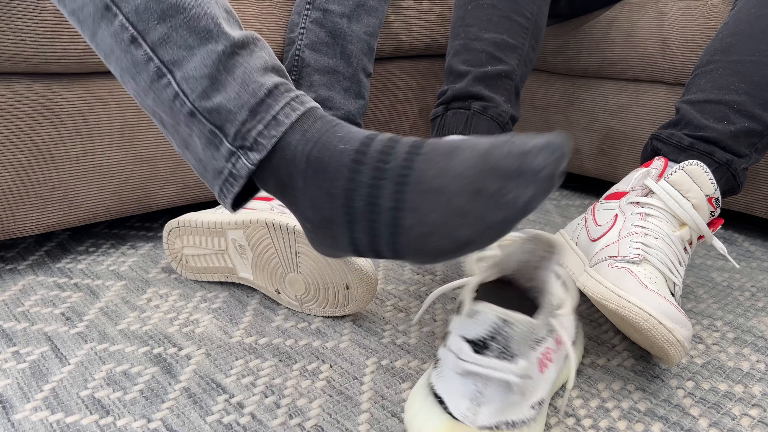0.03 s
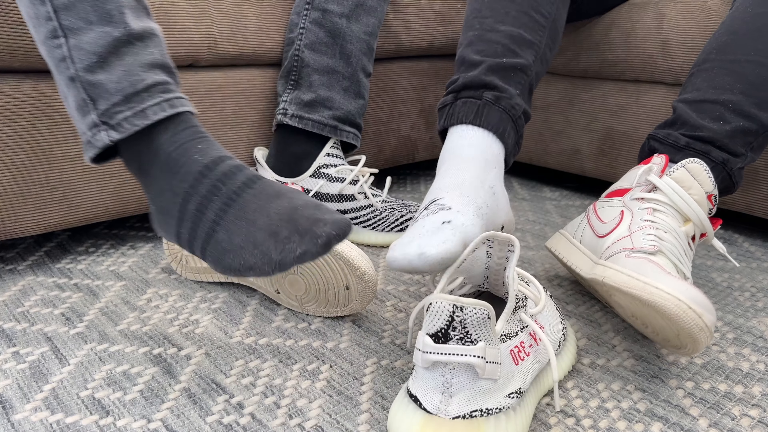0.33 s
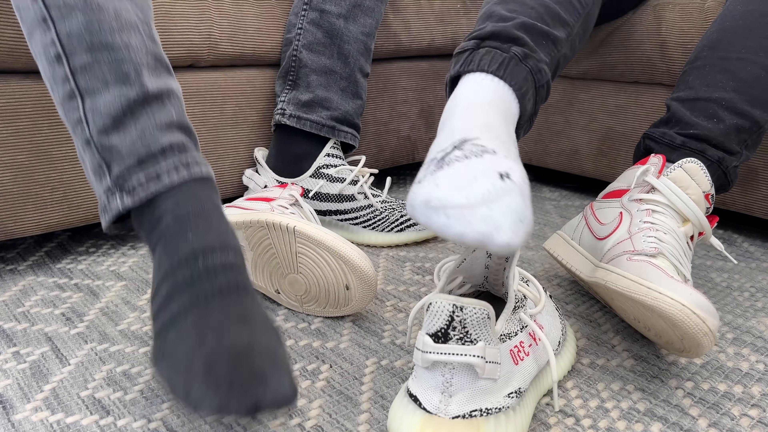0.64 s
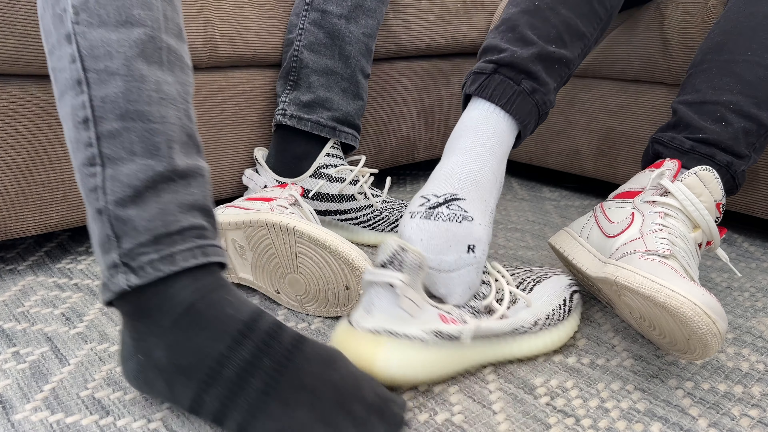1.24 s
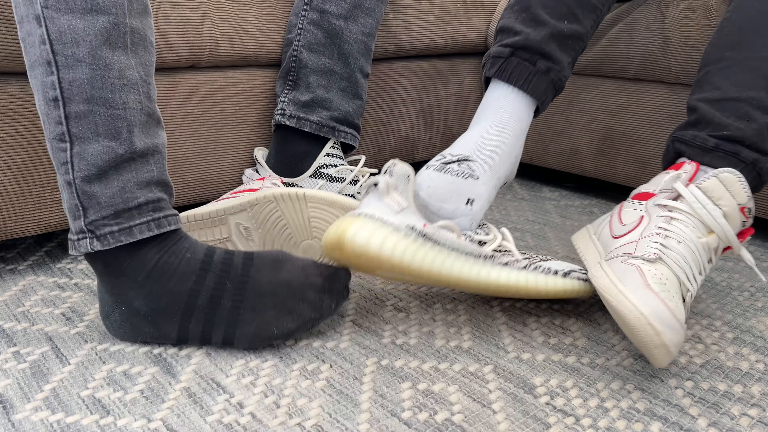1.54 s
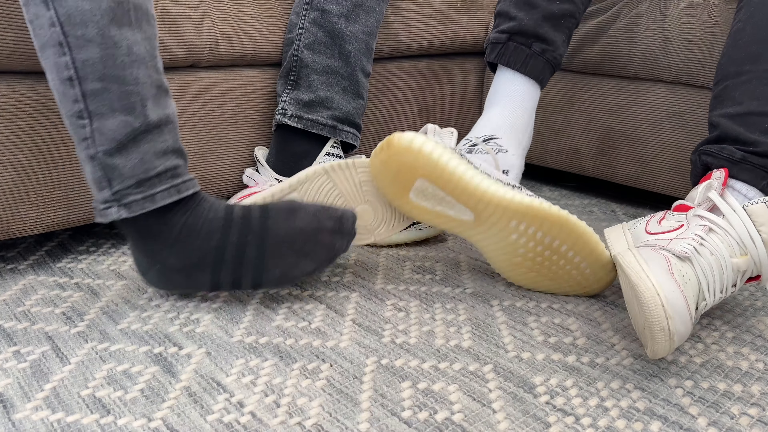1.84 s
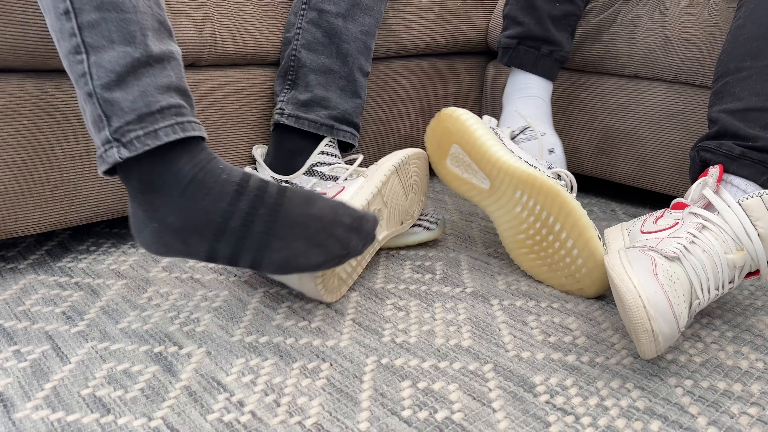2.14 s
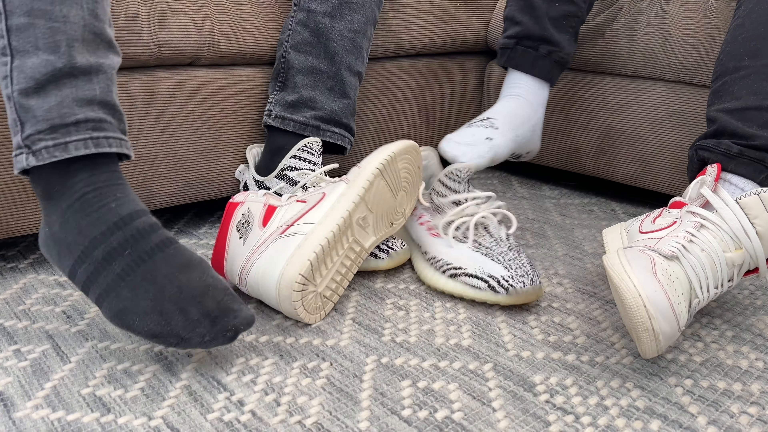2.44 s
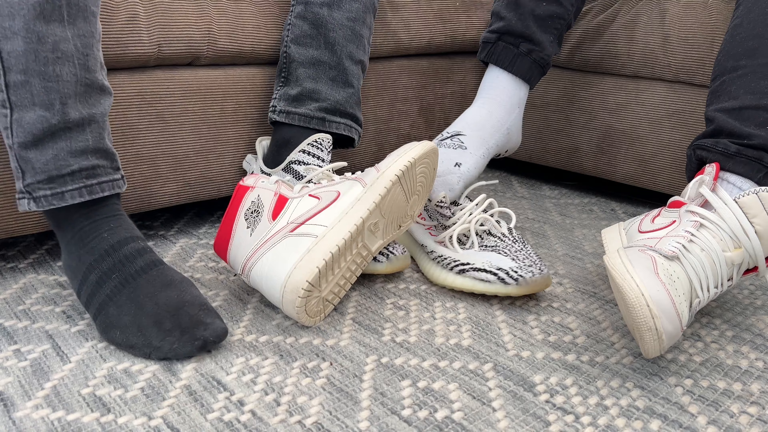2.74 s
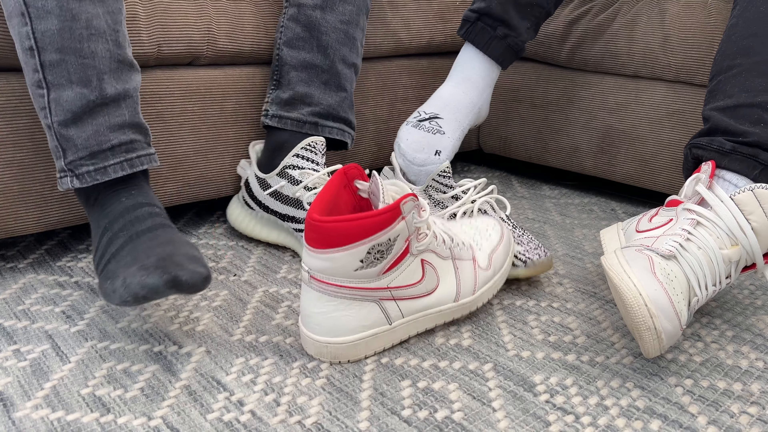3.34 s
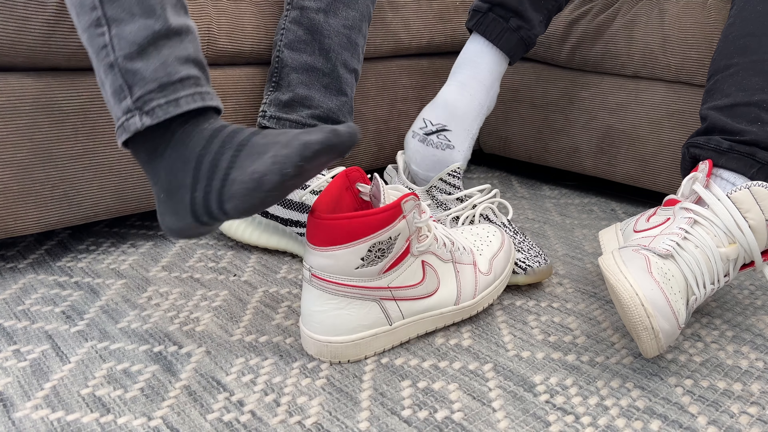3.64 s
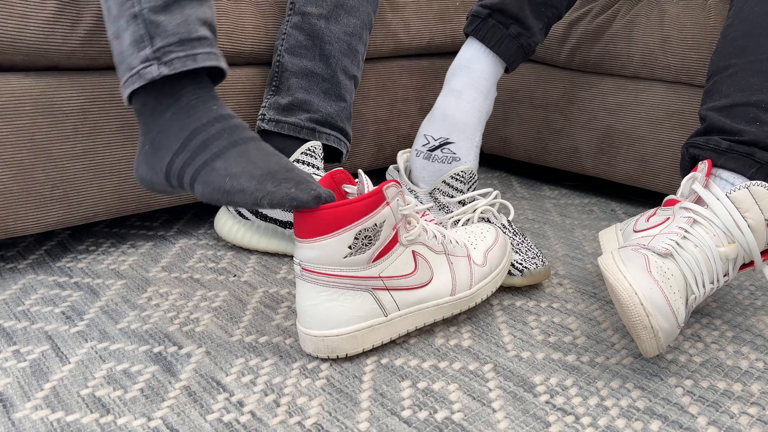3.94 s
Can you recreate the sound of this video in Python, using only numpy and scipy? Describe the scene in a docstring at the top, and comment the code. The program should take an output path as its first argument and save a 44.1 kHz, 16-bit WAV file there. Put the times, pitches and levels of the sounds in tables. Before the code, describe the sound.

Sneakers bump and scuff on a rug, close by, as socked feet push them about. A padded knock comes at the start, then soft brushing and rasping from about 0.9 to 1.5 seconds with another bump. Several light knocks and ticks cluster between 1.8 and 2.4 seconds. At 3.2 seconds a shoe tips onto its sole with a low thump. A deep hum swells and fades over room rumble throughout.

```python
"""A deep hum swells and fades over the rumble of a small furnished room. Close by, feet in socks push
sneakers about on a rug: laces and leather tick, the shoes bump so that their rubber soles ring briefly,
and cloth and soles brush and rasp in soft strokes as fibres catch. Near the end one shoe tips over
onto its sole with a low thump."""
import sys
import numpy as np
from scipy import signal
from scipy.fft import rfft, irfft, next_fast_len
from scipy.io import wavfile
from scipy.ndimage import uniform_filter1d, map_coordinates

SR = 44100
rng = np.random.default_rng(int(sys.argv[2]) if len(sys.argv) > 2 else 0)


def waveform_to_disk(signal):
    """Save audio, clipped to [-1, 1], as 16-bit WAV at the path in sys.argv[1]."""
    frames = np.transpose(np.atleast_2d(signal))
    scaled = np.clip(frames, -1, 1) * 32767
    samples = np.round(scaled).astype(np.int16)
    wavfile.write(sys.argv[1], SR, samples)


N = 176400  # 4 seconds
LAG_CYCLES = 1.697  # the bass of a bump comes after its treble

# tone of rubbing cloth: (frequency [Hz], relative level [dB])
CLOTH_TONE = [(300, -8), (900, 2), (1500, 3), (2300, 2), (3600, 1), (5200, -1), (6800, -1.5), (8300, -0.5),
              (9200, -4), (10000, -23.5), (12500, -10), (15500, -25.5)]


def amp(db):
    """Turn decibels into a gain."""
    return 10 ** (np.asarray(db) / 20)


def unit(x):
    """Scale a sound to an average strength (rms) of 1."""
    return x / np.sqrt(np.mean(x ** 2) + 1e-20)


def along(points, hz):
    """Read between (frequency, value) points on a log scale."""
    freqs, values = np.transpose(points)
    return np.interp(np.log(hz + 1), np.log(freqs + 1), values)


def curve(rows):
    """Join (time, value) points with lines, one value per sample."""
    return np.interp(np.arange(N) / SR, *np.transpose(rows))


def wobble(rate):
    """A smooth curve through `rate` random points a second."""
    points = rng.standard_normal(int(N * rate / SR) + 4)
    return map_coordinates(points, [np.arange(N) * rate / SR])


def bell(hz, centre_hz, octaves):
    """A bell-shaped gain that favours pitches near the centre."""
    return np.exp(-.5 * (np.log2(np.maximum(hz, 1) / centre_hz) / octaves) ** 2)


def filtered(x, response):
    """Turn each frequency up or down by response(hz)."""
    size = next_fast_len(N + SR // 2)
    return irfft(rfft(x, size) * response(np.fft.rfftfreq(size, 1 / SR)), size)[..., :N]


def stereo(pair, tone, alike):
    """Give two unrelated noises a tone and blend them into partly alike left and right."""
    turn = lambda hz: np.arccos(np.clip(along(alike, hz), -1, 1)) / 2
    mid, side = filtered(pair, lambda hz: amp(along(tone, hz)) * [np.cos(turn(hz)), np.sin(turn(hz))])
    return unit(np.array([mid + side, mid - side]))


def pan(db):
    """Gains that make the left side db louder than the right."""
    return amp([[db / 2], [-db / 2]])


def add(track, start, sound):
    """Mix a sound in at `start` seconds."""
    part = track[max(round(start * SR), 0):][:len(sound)]
    part += sound[:len(part)]


def contact(start, force, tone, lag=LAG_CYCLES):
    """A push heard through an object whose low notes come `lag` cycles late; its peak is 1."""
    size, lead = SR // 4, SR // 40
    hz = np.maximum(np.fft.rfftfreq(size, 1 / SR), 1)
    bass_delay = np.exp(-2j * np.pi * lag * np.log(hz / hz[-1]))
    hit = np.roll(irfft(rfft(force, size) * tone(hz) * bass_delay, size), lead)
    out = np.zeros(N)
    add(out, start - lead / SR, hit / np.abs(hit).max())
    return out


def hum():
    """A deep, nearly pure hum that drifts in pitch, swells and fades."""
    # the drift: (time [s], pitch [Hz])
    pitch = [(0, 52), (.5, 53.5), (1.0, 55.5), (1.6, 54), (2.4, 55.5), (2.8, 57), (3.3, 58.5), (3.6, 57.5),
             (4, 54.5)]
    # the swells: (time [s], level [dB])
    level = [(0, -46), (.1, -42.5), (.4, -43), (.68, -51), (1.0, -42), (1.3, -42.5), (1.48, -36.5),
             (1.58, -38.5), (1.7, -57), (2.05, -42), (2.25, -54.5), (2.45, -42.5), (2.64, -33.5),
             (2.98, -35.5), (3.18, -47), (3.47, -33.5), (3.6, -35.5), (3.72, -48), (4, -53.5)]
    wave = np.sqrt(2) * np.sin(2 * np.pi * np.cumsum(curve(pitch)) / SR)
    return amp(curve(level) + 0.34 * wobble(7.3)) * wave


def room_noise():
    """A steady rumble and a soft, slightly hollow rush of air that grows a little."""
    # tone of the rumble: (frequency [Hz], relative level [dB])
    rumble_tone = [(15, -33), (28, -20), (38, 1), (55, 2.5), (72, 3.5), (95, -2.5), (120, -4.5),
                   (140, -1.5), (178, -5), (215, -12), (260, -11.5), (340, -21.5), (500, -25.5), (900, -70)]
    # tone of the rush: (frequency [Hz], relative level [dB])
    air_tone = [(150, -15), (400, -2.5), (560, -1), (800, -2), (1200, -5), (1600, -11.5), (2100, -18.5),
                (3200, -27.5), (5500, -30.5), (8500, -38), (11000, -46), (15500, -54.5)]
    # peaks that make it hollow: (frequency [Hz], half width [Hz], boost [dB])
    air_peaks = [(542, 17, 4.5), (651, 19, 6), (801, 63, 5)]
    # loudness of the rush: (time [s], level [dB])
    air_level = [(0, -56), (.7, -57), (1.5, -54), (2.0, -53.5), (2.6, -53.5), (3.4, -53.5), (4, -53)]
    # how alike left and right are: (frequency [Hz], likeness [0 to 1])
    alike = [(60, 0.96), (130, 0.98), (260, 0.77), (500, 0.37), (1000, 0.38), (2500, 0.13), (8000, 0.067)]
    rumble = stereo(rng.standard_normal((2, N)), rumble_tone, alike)
    air = stereo(rng.standard_normal((2, N)), air_tone, alike)
    hollow = lambda f: amp(sum(db / (1 + ((f - hz) / width) ** 2) for hz, width, db in air_peaks))
    air = unit(filtered(air, hollow))
    return amp(-44.5) * rumble + amp(curve(air_level) + 0.37 * wobble(5.03)) * air


def ticks():
    """Laces and leather snap: each tick is a tiny burst of noise."""
    # (time [s], peak level [dB], centre [Hz], width [octaves], time to fade by 60 dB [s])
    snaps = [(0.032, -60, 3000, 0.32, 0.02), (.149, -63, 2800, 0.76, .012),
             (1.573, -50, 3000, 0.65, 0.0075), (1.585, -56, 3500, 0.96, .005),
             (1.634, -63, 4000, 0.89, .005), (1.956, -56.5, 2900, 0.35, .01),
             (1.956, -64.5, 8000, .6, .008), (2.24, -42, 3000, 0.95, 0.0094),
             (2.244, -48, 2200, 0.31, .012), (2.884, -60, 4500, 0.68, .012),
             (3.253, -49.5, 1690, 0.25, .012), (3.9640, -43, 3360, 0.15, 0.0027),
             (3.963, -47, 2310, 0.18, 0.015)]
    out, t = np.zeros(N), np.arange(SR // 20) / SR
    for start, db, hz, octaves, fade in snaps:
        burst = rng.standard_normal(len(t)) * amp(-60 * t / fade)
        out += amp(db) * contact(start, burst, lambda f: bell(f, hz, octaves))
    return out


def room_echo(sound):
    """The short, dull echo of a furnished room, where high notes die first."""
    # length of the echo: (frequency [Hz], time to fade by 60 dB [s])
    fade_times = [(100, 0.17), (500, 0.17), (2000, 0.14), (10000, 0.069)]
    hz, t, noise = signal.stft(rng.standard_normal((2, SR // 2)), SR, nperseg=256)
    tail = signal.istft(noise * amp(-60 * t / along(fade_times, hz)[:, None]), SR, nperseg=256)[1]
    delayed = np.pad(sound, (SR // 200, 0))  # 5 ms
    return signal.fftconvolve(delayed[None], tail / np.linalg.norm(tail[0]), axes=1)[:, :N]


def bumps():
    """Shoes bump the floor and each other: padded blows, each with a brief ring of the sole."""
    # (time [s], level [dB], centre [Hz], width [octaves])
    blows = [(.0853, -44.5, 990, 0.23), (.0858, -33, 520, 0.34), (.0895, -33.5, 275, 0.2),
             (.097, -34.5, 149, 0.22), (.094, -30.5, 73, 0.6), (1.3064, -38.5, 990, 0.19),
             (1.3078, -33, 540, 0.38), (1.3095, -38, 382, 0.2), (1.830, -33.5, 327, 0.31),
             (2.079, -36.5, 348, 0.27), (2.143, -32, 258, 0.3), (2.187, -42, 510, 0.7),
             (2.242, -37.5, 333, 0.17), (2.426, -38.5, 774, 0.14), (2.765, -44.5, 378, .35),
             (3.350, -37.5, 617, 0.38), (3.9634, -44.5, 830, 0.35)]
    out = np.zeros(N)
    for start, db, hz, octaves in blows:
        tone = lambda f: bell(f, hz, octaves)
        out += amp(db) * contact(start, [1], tone)
        add(out, start, amp(db) * sole_ring(tone))
    return out


def sole_ring(tone):
    """A struck rubber sole rings at a few notes that die quickly."""
    # (pitch [Hz], relative level [dB], time to fade by 60 dB [s])
    notes = [(242.4, -17.5, 0.097), (405, -23.5, 0.058), (570, -38, 0.06), (682, -10, 0.047),
             (820, -30, 0.022)]
    ring, t = 0, np.arange(SR // 4) / SR
    for hz, db, fade in notes:
        onset = 1 - np.exp(-t * hz / LAG_CYCLES)
        decay = amp(db + rng.normal(0, 2.0) - 60 * t / fade)
        ring += onset * decay * tone(hz) * np.sin(2 * np.pi * hz * t)
    return ring


def cloth_folds(pair, depth_db=1.7):
    """A rub's tone shifts as cloth folds: random patches of time and pitch get louder or softer."""
    bands = signal.stft(pair, nperseg=512)[2]
    patches = uniform_filter1d(rng.standard_normal(bands.shape[1:]), size=6, axis=0)
    patches = uniform_filter1d(patches, size=10, axis=1)
    return signal.istft(bands * amp(depth_db * unit(patches)), nperseg=512)[1][:, :N]


def friction(tone):
    """Smooth rubbing under unsteady pressure, with tiny clicks as fibres catch."""
    # how alike left and right are: (frequency [Hz], likeness [0 to 1])
    alike = [(200, 0.87), (700, 0.73), (2000, 0.52), (3300, 0.22), (5500, 0.5), (9000, 0.2), (14000, 1)]
    catches_per_s, catch_share, spread_db, pressure_db = 2500, 0.26, 5, 0.45
    caught = rng.random((2, N)) < catches_per_s / SR
    catches = caught * rng.standard_normal((2, N)) * amp(spread_db * rng.standard_normal((2, N)))
    smooth = rng.standard_normal((2, N))
    rub = np.sqrt(catch_share) * unit(catches) + np.sqrt(1 - catch_share) * smooth
    return stereo(cloth_folds(rub), tone, alike) * amp(pressure_db * wobble(49))


def brushing():
    """Cloth and shoes brush the rug in strokes: the cloth hisses and the rug scuffs lower down."""
    # (start [s], rise [s], hold [s], release [s], hiss level [dB], scuff level [dB])
    strokes = [(0.138, 0.051, 0.3, 0.056, -79.5, -63.5), (.21, 0.041, .02, 0.058, -73.5, -76),
               (0.393, 0.033, 0.011, 0.032, -71.5, -67), (0.48, 0.23, 0.21, .1, -72.5, -65),
               (0.872, 0.05, .04, .09, -56.5, -66), (0.957, 0.068, .18, 0.084, -59.5, -64),
               (1.126, 0.15, 0.05, 0.14, -56, -51), (1.332, 0.052, 0.076, 0.11, -58.5, -56.5),
               (1.496, 0.068, 0.078, 0.13, -68, -63), (1.601, 0.076, 0.086, 0.098, -67.5, -59),
               (1.978, 0.14, 0.077, 0.055, -69, -51), (2.152, 0.088, 0.0089, 0.023, -58.5, -49.5),
               (2.25, 0.014, 0.016, 0.095, -66, -57.5), (2.349, 0.035, 0.021, 0.17, -75.5, -56),
               (2.615, 0.087, 0.089, 0.088, -72, -60.5), (2.835, 0.019, 0.024, 0.27, -73.5, -58),
               (3.207, 0.0093, 0.036, 0.051, -70, -51.5), (3.26, 0.025, 0.028, 0.17, -76.5, -54),
               (3.597, 0.034, 0.18, .07, -77.5, -69), (3.945, 0.0088, 0.02, 0.044, -72.5, -56)]
    # tone of the rug: (frequency [Hz], relative level [dB])
    scuff_tone = [(80, -29), (200, -13.5), (380, 2.5), (560, -3), (850, -8), (1300, -11), (2000, -25),
                  (3000, -23), (5000, -57)]
    # where the hiss sits: (frequency [Hz], left over right [dB])
    hiss_pan = [(1000, 4.5), (3300, 2.5), (5500, 9.5), (9000, -0.5), (15000, 0)]
    t = np.arange(N) / SR
    hiss_power, scuff_power = np.zeros(N), np.zeros(N)
    for start, rise, hold, release, hiss_db, scuff_db in strokes:
        rising = (t - start) / rise
        falling = 1 - (t - start - rise - hold) / release
        speed = np.clip(np.minimum(rising, falling), 0, 1)
        hiss_power += (speed * amp(hiss_db)) ** 2
        scuff_power += (speed * amp(scuff_db)) ** 2
    cloth = filtered(friction(CLOTH_TONE), lambda hz: amp(np.outer([.5, -.5], along(hiss_pan, hz))))
    return np.sqrt(hiss_power) * cloth + np.sqrt(scuff_power) * friction(scuff_tone)


def rasps():
    """Socks and soles rasp on a shoe or the rug, each short rub in its own range of pitch."""
    # (middle [s], half length [s], level [dB], centre [Hz], width [octaves])
    rubs = [(0.253, 0.015, -72, 2250, .2), (0.376, 0.012, -73, 2340, .2), (0.449, 0.014, -70.5, 2360, 0.25),
            (0.963, 0.022, -68, 2550, .3), (0.955, .022, -66, 8200, 0.19), (1.15, 0.08, -61, 3100, .23),
            (1.195, 0.028, -53, 780, .5), (1.31, 0.015, -61.5, 2400, 0.34),
            (2.21, 0.072, -68.5, 2400, 0.43), (2.77, 0.021, -70.5, 3000, 0.22),
            (3.30, 0.038, -65, 2080, 0.2), (3.97, .04, -70, 3100, .3)]
    cloth = friction(CLOTH_TONE)
    out, t = np.zeros((2, N)), np.arange(N) / SR
    for middle, half, db, hz, octaves in rubs:
        swell = np.exp(-.5 * ((t - middle) / half) ** 2)
        out += amp(db) * swell * unit(filtered(cloth, lambda f: bell(f, hz, octaves)))
    return out


def landing():
    """A shoe tips over: its edge clacks, the floor gives with a thump, then the sole slaps flat."""
    # tone of the clack: (frequency [Hz], relative level [dB])
    edge_tone = [(100, -14.5), (250, 0.5), (350, -4), (450, -1), (650, 2), (790, -9.5), (950, -5.5),
                 (1150, -16.5), (1700, -11), (2200, -20), (2700, -29), (3300, -35.5), (3900, -57),
                 (7000, -74)]
    clack_s, thump_s, slap_s = 3.2228, 3.224, 3.238
    edge = lambda f: amp(along(edge_tone, f))
    clack = amp(-21) * contact(clack_s, [1], edge, lag=1.5)
    add(clack, clack_s, amp(-19) * sole_ring(edge))
    thump = amp(-26.5) * contact(thump_s, [1], lambda f: bell(f, centre_hz=116, octaves=0.56))
    slap = amp(-29) * contact(slap_s, [1], lambda f: bell(f, centre_hz=253, octaves=0.19))
    return clack + thump + slap


def scene():
    """Mix shoes, cloth, hum and room; only the hits get an echo."""
    hits = bumps() + landing() + ticks()
    echo = amp(-15.5) * room_echo(hits)
    return hits * pan(db=2.0) + echo + brushing() + rasps() + hum() + room_noise()


def record(dry):
    """Cut away the very highest treble."""
    top_hz = 16500
    return signal.sosfiltfilt(signal.cheby2(16, 60, top_hz, fs=SR, output="sos"), dry)


dry = scene()
out = record(dry)
waveform_to_disk(out)
```